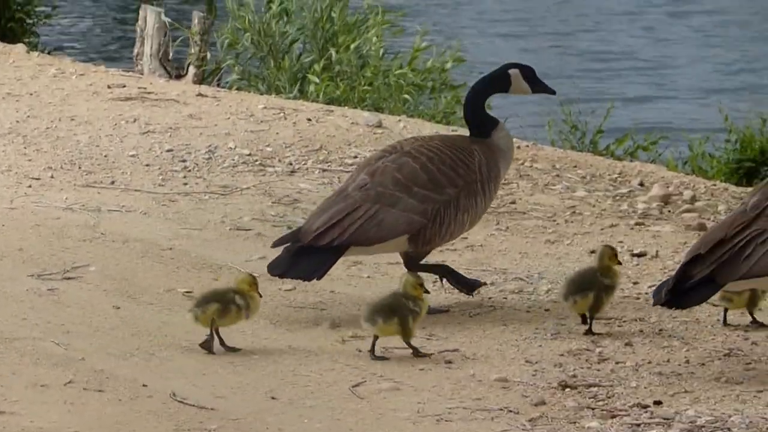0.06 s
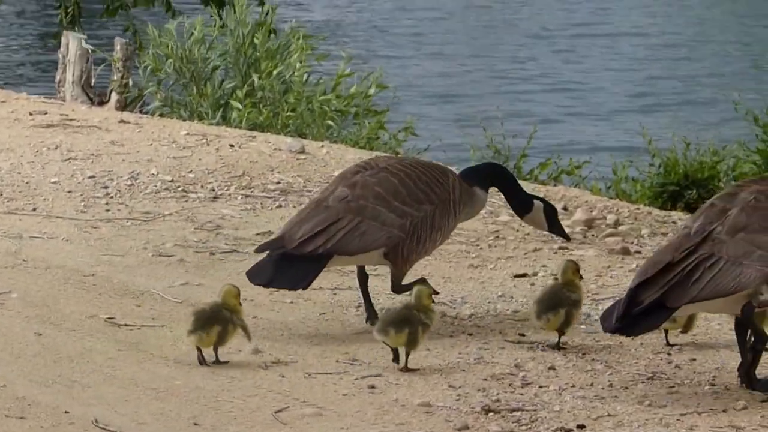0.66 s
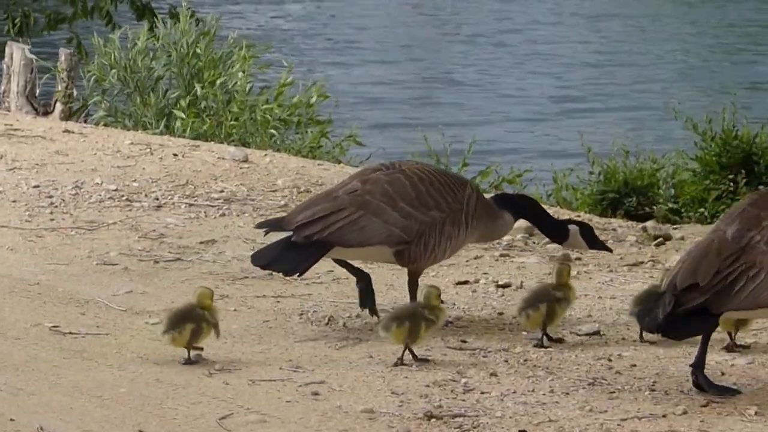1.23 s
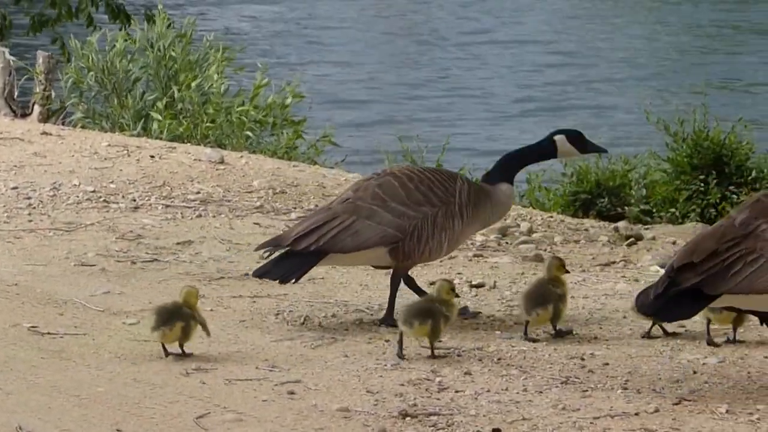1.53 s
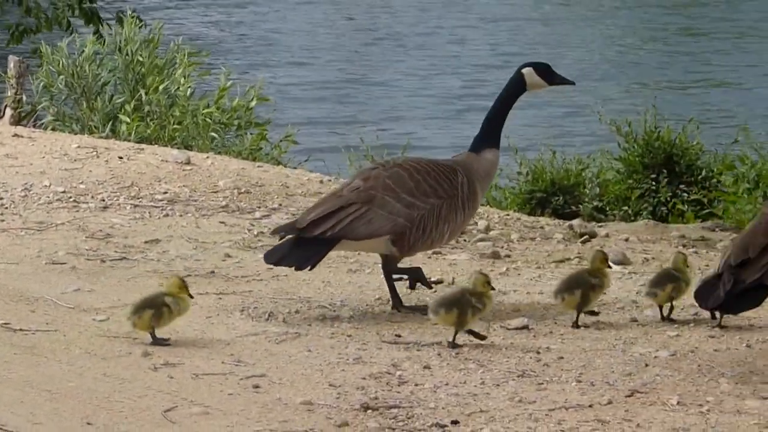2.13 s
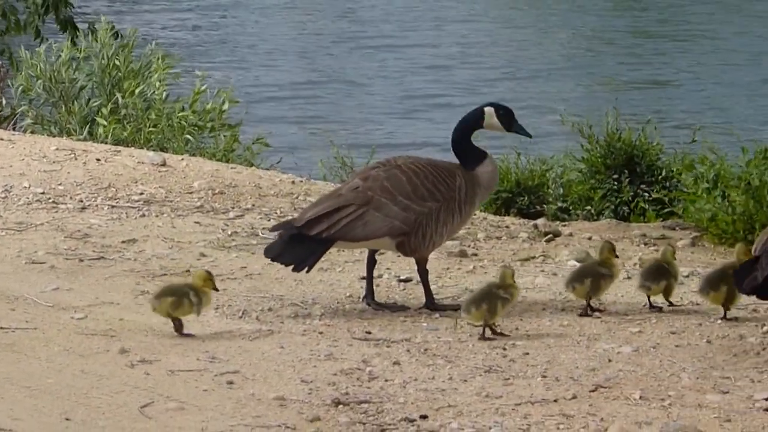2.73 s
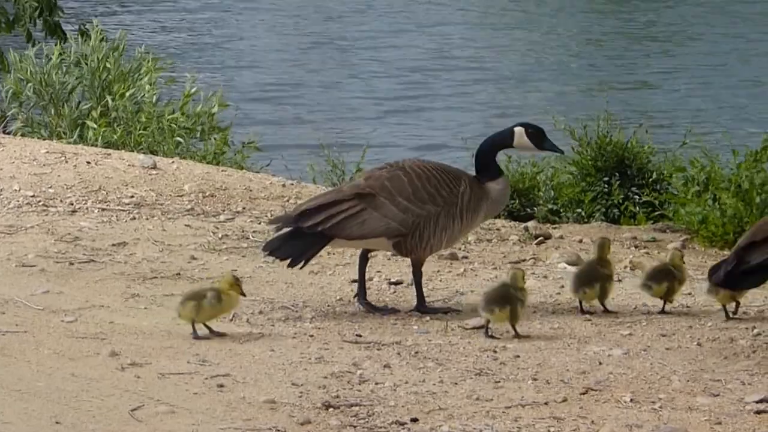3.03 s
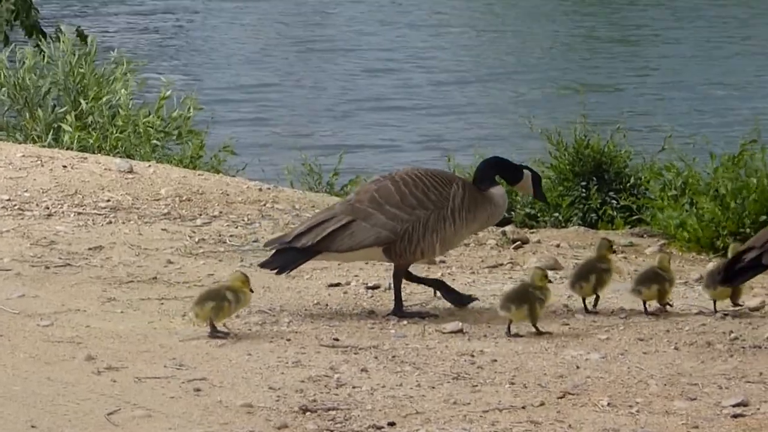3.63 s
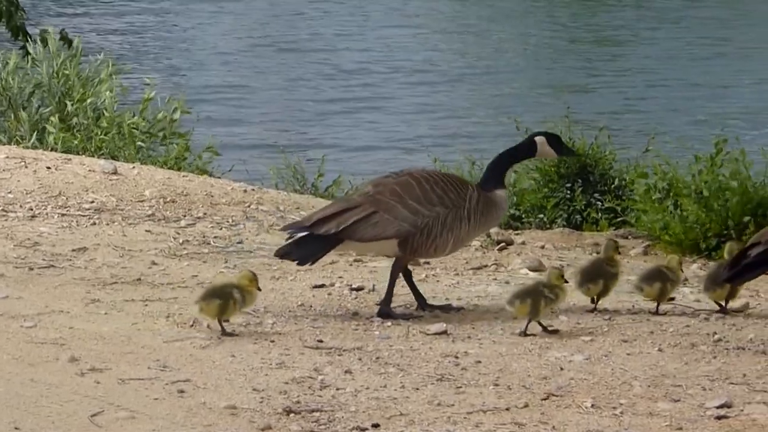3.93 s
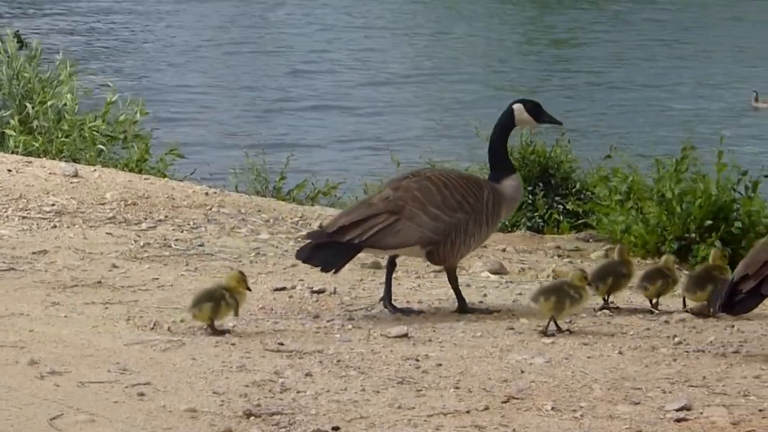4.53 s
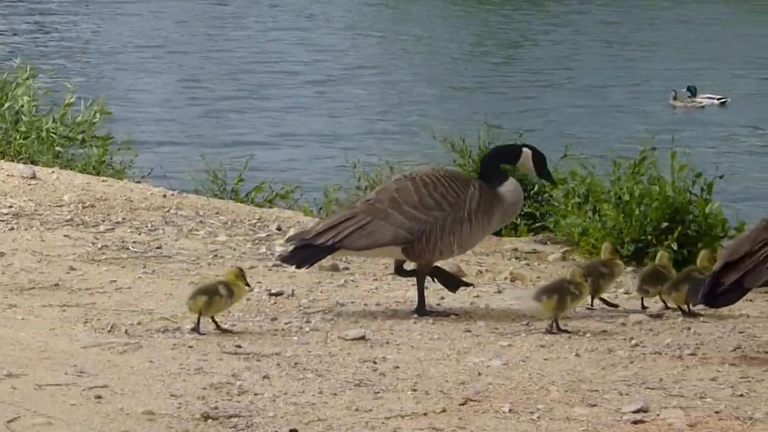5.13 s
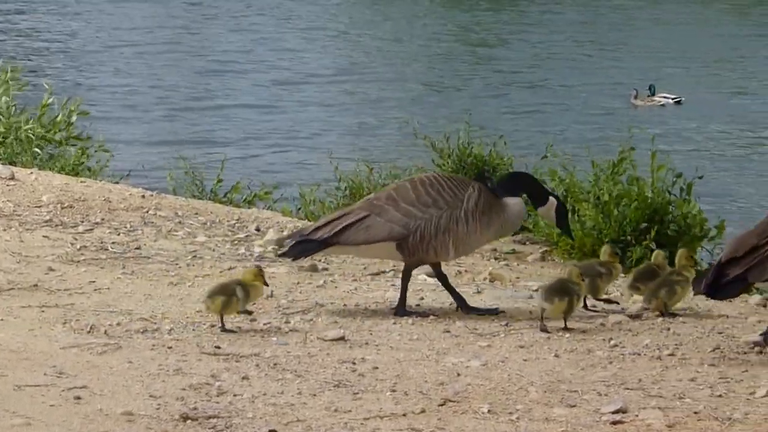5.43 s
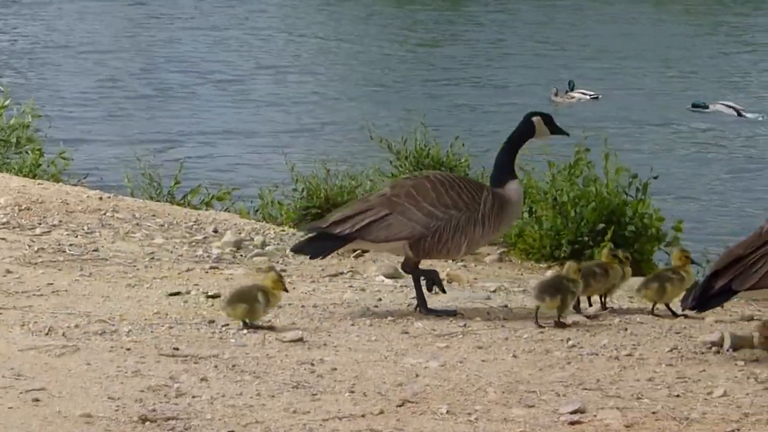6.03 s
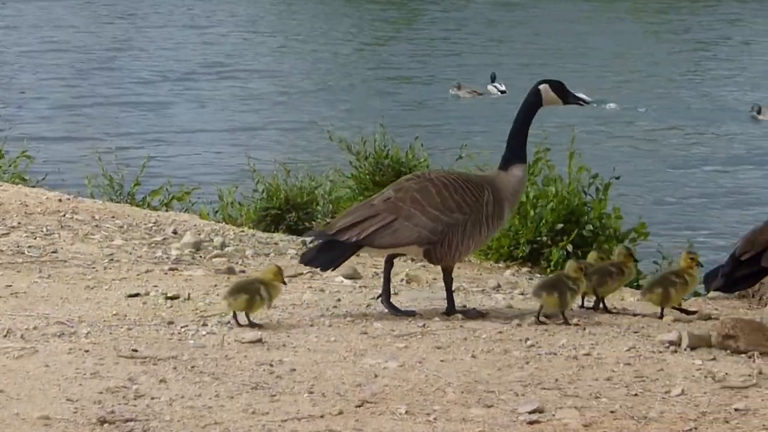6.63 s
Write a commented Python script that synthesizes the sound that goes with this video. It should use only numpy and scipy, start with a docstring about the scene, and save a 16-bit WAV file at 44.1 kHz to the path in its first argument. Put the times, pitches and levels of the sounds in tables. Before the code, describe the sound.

Geese honk in a quick run of short, rattly calls on a lake shore, with a few faint gosling peeps. The honks pause, one bird hisses softly, then a second run follows, clearer and quieter. Wind rumbles on the microphone, with one hard thump near the end of the first run. A soft wash of water and leaves and a far engine hum fade underneath.

```python
"""Geese on a windy lake shore

Geese lead their goslings along the water in runs of short honks that start as a rattle and break
into a clear tone. The goslings peep, one bird hisses softly, and a far engine fades behind the wash
of the shore. Gusts buffet the microphone, and the hardest one makes the limiter duck."""
import sys
import numpy as np
from scipy import signal
from scipy.fft import rfft, irfft, next_fast_len
from scipy.io import wavfile
from scipy.ndimage import uniform_filter1d, minimum_filter1d

SR = 44100
rng = np.random.default_rng(int(sys.argv[2]) if len(sys.argv) > 2 else 0)


def unload_audio(sound):
    """Save the sound as a 16-bit wav file, at the path given as the first command line argument."""
    columns = np.transpose(np.atleast_2d(sound))
    # keep every value between -1 and 1, then stretch to whole-number steps
    steps = np.round(np.clip(columns, -1, 1) * 32767)
    wavfile.write(sys.argv[1], SR, steps.astype(np.int16))


N = 298557

# Cue levels are set ahead of the mix trims; EQ curves give shape only.
# Honks: start_s, end_s, top_hz, droop_share, level_db, second_harmonic_relative_db,
# overtones_relative_db, swell_s, fade_s, lowest_resonance_hz, resonance_rise_hz, upper_tuning_ratio
HONK_CUES = [(-0.09, 0.1, 1005, 0.075, -22.5, -15.5, -14, .04, .10, 2060, -2, 0.92),
             (0.19, 0.413, 1000, 0.076, -19.5, -16.5, -16, 0.1185, 0.074, 2100, 0, 0.95),
             (0.56, 0.755, 1070, 0.071, -21, -10, -15, 0.037, 0.094, 2530, 548, 1.01),
             (0.92, 1.105, 1070, .04, -21.5, -14.5, -15.5, .025, 0.065, 2370, 101, 1.002),
             (1.253, 1.44, 1065, .05, -21, -13, -21, 0.024, 0.018, 2350, -2, 1.027),
             (1.636, 1.825, 1058, 0.042, -21, -13.5, -16.5, 0.0062, 0.069, 2130, 0, 0.994),
             (2.025, 2.203, 1040, .045, -29.5, -15.5, -19.5, .004, 0.021, 2040, 247, .96),
             (2.512, 2.712, 1034, 0.054, -27, -12.5, -20, 0.0442, 0.067, 2100, 0, 1.0),
             (3.552, 3.915, 1030, .05, -26, -14, -18, .04, 0.31, 2000, -1, 0.998),
             (3.912, 4.147, 1020, .04, -32, -9.5, -16.5, 0.023, 0.061, 2230, 0, 1.05),
             (4.272, 4.47, 1034, .04, -35, -11.5, -15, 0.026, 0.093, 2160, 0, 1.026),
             (4.615, 4.8, 1086, 0.041, -34, -7.5, -13, 0.1, 0.07, 2420, -6, 1.08),
             (5.007, 5.205, 1056, 0.036, -35, -12, -16.5, 0.019, 0.061, 2370, -5, 1.03),
             (5.39, 5.58, 1044, 0.037, -35.5, -12.5, -17.5, 0.033, .06, 2120, 0, 1.01),
             (5.862, 6.055, 1030, .035, -37, -10, -20, 0.018, .02, 2290, -2, 1.03),
             (6.61, 6.82, 1030, .04, -32.5, -13.5, -20, .025, 0.057, 2190, 0, 1.007)]
# Breaks into a clear tone: start_s, end_s, top_hz, clear_share, odd_overtones_db, second_boost_db
CLEAR_CUES = [(0.943, 1.059, 1074, 0.47, 8, -4), (1.332, 1.417, 1141, 0.98, -6, 7.5),
              (1.707, 1.802, 1123, .89, -10, 6.5), (2.094, 2.172, 1131, 0.99, -5, 8.5),
              (3.681, 3.763, 1115, .83, -9, 7), (3.958, 4.109, 1148, 1, -12, 9),
              (4.345, 4.438, 1143, 1, -9, 12), (4.662, 4.784, 1153, 0.94, 0, 5.5),
              (5.059, 5.172, 1126, 1, 0, 8.5), (5.454, 5.536, 1120, 0.89, -2, 6)]
# Throat colour for the fundamental, second harmonic and overtones: frequency_hz, gain_db
FUNDAMENTAL_EQ = [(550,-49.5),(740,-2.5),(870,0),(1020,3.5),(1200,-4),(1330,-0.5),(1700,-8)]
SECOND_EQ = [(1200,-39),(1600,3),(1950,9),(2300,14.5),(2600,13),(2850,-22),(3300,-59)]
OVERTONE_EQ = [(2200,-32.5),(2650,9.5),(3100,-4),(3550,2),(4100,3.5),(4650,3),(5300,-0.5),(6050,2.5),(6800,-10.5),(8300,7),(10500,-13),(12300,-13),(15000,-31.5)]
# Faders of the shore bed: time_s, wash_db, rustle_db
SHORE_FADERS = [(0.14, -36.5, -49), (1.2, -36.5, -48), (1.57, -38.5, -49), (2.24, -42.5, -52),
                (2.42, -50, -54), (2.78, -45, -53.5), (3.1, -45.5, -87), (3.47, -48, -50.5),
                (4.21, -51, -54), (4.53, -53.5, -58.5), (4.92, -56, -59.5), (6.33, -55.5, -59.5),
                (6.5, -53.5, -56.5)]
# Colour of the low wash and the bright rustle: frequency_hz, gain_db
WASH_EQ = [(25,-40),(60,-27.5),(110,-8),(250,-6.5),(500,-11),(650,-3),(820,2.5),(1000,0.5),(1400,-2),(2000,-11),(3000,-21),(5000,-22.5)]
RUSTLE_EQ = [(1200,-34),(2200,-5.5),(3200,-2),(4300,3),(5500,3),(7000,-0.5),(8500,-6.5),(10000,-12),(12500,-23),(15500,-32)]
# The far engine fading: time_s, level_db
ENGINE_FADER = [(0, -50.5), (1.2, -51.5), (1.9, -56), (2.5, -51.5), (3.2, -58.5), (6.77, -66.5)]
# Gosling peeps and one far call: start_s, length_s, from_hz, to_hz, level_db
PEEP_CUES = [(0.455,0.05,3330,3930,-46), (1.118,0.043,6760,7270,-43.5), (1.155,0.03,7050,7320,-53),
             (2.69,0.042,4144,4280,-51), (2.77,0.065,4270,4274,-57)]
FAR_CALL_CUES = [(1.44,0.096,1240,1357,-32.5)]
# Wind strength on the microphone: time_s, level_db
WIND_FADER = [(0.74, -56), (0.9, -44), (1.18, -40), (1.32, -50), (1.62, -47), (1.72, -32.5), (1.92, -33),
              (2.2, -43), (2.44, -27.5), (2.62, -35.5), (2.86, -29.5), (3.52, -41.5), (3.87, -28),
              (4.6, -30), (4.9, -29), (5.4, -29.5), (6.22, -27), (6.3, -46.5), (6.56, -36.5), (6.77, -32.5)]
# The hardest buffets: peak_s, level_db, width_s
BUFFET_CUES = [(0.896, -29, 0.0068), (1.21, -28, 0.025), (1.42, -27.5, .012), (1.947, 1, 0.0062),
               (2.082, -20.5, .005), (2.286, -24.5, 0.0074), (2.461, -28.5, 0.026), (2.783, -28, 0.0064),
               (2.924, -26, 0.0067), (3.22, -30.5, 0.046), (3.339, -23.5, .01), (3.701, -19, 0.0074),
               (4.257, -20, 0.0056), (4.465, -20, 0.0098), (4.549, -14.5, 0.0029), (4.6, -23, .015),
               (5.234, -21.5, .004), (5.391, -22, 0.0074), (5.648, -26, 0.0075), (5.72, -16, 0.0052),
               (5.9, -26.5, .018), (6.42, -26, 0.011), (6.564, -27, 0.013)]
# Colour of the wind rumble: frequency_hz, gain_db
WIND_EQ = [(21, -78), (35, -13.5), (90, -12.5), (144, 2), (263, -0.5), (376, -3.5), (578, -6.5),
           (632, -8.5), (920, -18), (1080, -29), (1440, -34.5), (2500, -53.5), (3250, -63), (5500, -120)]
# The swell of a goose's hiss: time_s, level_db
HISS_FADER = [(0,-100),(2.55,-94),(2.8,-52.5),(3.0,-51.5),(3.2,-49.5),(3.32,-51),(3.4,-57.5),(3.6,-100)]
# Colour of that hiss: frequency_hz, gain_db
HISS_EQ = [(1500,-31.5),(2500,-19),(3600,-4),(5000,-0.5),(6500,-4),(8500,-9),(10500,-17.5),(15000,-38)]

UPPER_WINDPIPE_HZ = np.array([3003, 3984, 4970])  # resonances, retuned for each honk
TIME_S = np.arange(N) / SR


def from_db(db):
    """Decibels to gain."""
    return 10 ** (np.asarray(db) / 20)


def unit_power(x):
    """Scale to unit power."""
    return x / np.sqrt(np.mean(x ** 2) + 1e-20)


def faders(rows):
    """Straight fader moves between timed points, one curve per level column."""
    times, *columns = np.transpose(rows)
    return [np.interp(TIME_S, times, column) for column in columns]


def drift(rate_hz):
    """A smooth random wander of unit power, changing about rate_hz times a second."""
    hz = np.fft.rfftfreq(2 * N, 1 / SR)[:N // 20]
    noise = rng.standard_normal(2 * len(hz) - 2)
    slow = irfft(rfft(noise) * np.exp(-(hz / rate_hz) ** 2 / 2))
    return unit_power(np.interp(np.arange(N) / 20, np.arange(len(slow)), slow))


def equalised(x, curve):
    """Shape a sound with an EQ curve; unit power."""
    size = next_fast_len(N)
    hz, db = np.transpose(curve)
    bins = np.fft.rfftfreq(size, 1 / SR) + 1
    gain = from_db(np.interp(np.log(bins), np.log(hz), db, left=-90, right=-90))
    return unit_power(irfft(rfft(x, size) * gain, size)[..., :N])


def filtered(x, kind, hz, order=1):
    """A gentle low-pass or high-pass."""
    return signal.sosfilt(signal.butter(order, hz, kind, fs=SR, output="sos"), x)


def resonate(x, hz, width_hz):
    """A moving resonance: shift its centre to zero, low-pass, shift back; unit power."""
    turn = np.exp(2j * np.pi * np.cumsum(hz) / SR)
    return unit_power((filtered(x / turn, "low", width_hz / 2, order=2) * turn).real)


def panned(x, right_db):
    """Place a sound so that the right side is louder by right_db."""
    gains = from_db([[0], [right_db]])
    return x * gains / gains.mean()


def wide_noise(curve, side_db):
    """Stereo noise that opens wider in the top octaves."""
    mid, side = equalised(rng.standard_normal((2, N)), curve)
    side = side + 2.8 * filtered(side, "high", 7000)
    return mid + from_db(side_db) * side * [[1], [-1]]


def around(start, end):
    """The samples of a cue with short handles, and their times."""
    at = np.arange(max(int(start * SR) - 600, 0), min(int(end * SR) + 600, N))
    return at, at / SR


def ramp(t, start, end, edge_s):
    """1 between start and end, 0 outside, with edges edge_s long."""
    return np.clip(np.minimum(t - start, end - t) / edge_s + .5, 0, 1)


def honk_shapes(slack_db=-10.5, dull_db=-2.5, slack_sag=.035):
    """Pressure peaks mid-honk; as the voice swells and fades it is weaker, duller and flatter."""
    gains, windpipe = np.zeros((3, N)), np.zeros((4, N))
    pitch = np.full(N, float(HONK_CUES[0][2]))
    for (start, end, top_hz, droop, db, second_db, upper_db,
         swell_s, fade_s, lowest_hz, rise_hz, tuning) in HONK_CUES:
        at, t = around(start, end)
        slack = np.clip(1 - (t - start) / swell_s, 0, 1) ** 2
        slack += np.clip(1 - (end - t) / fade_s, 0, 1) ** 2
        along = (2 * t - start - end) / (end - start)  # -1 to 1 through the honk
        level_db = db + slack_db * slack
        dulled_db = level_db + dull_db * (slack + along ** 2)
        parts_db = [level_db, dulled_db + second_db, dulled_db + upper_db]
        gains[:, at] += ramp(t, start, end, edge_s=0.0017) * from_db(parts_db)
        pitch[at] = top_hz * (1 - droop * along ** 2 - slack_sag * slack)
        windpipe[:, at[0]:] = np.append(lowest_hz, tuning * UPPER_WINDPIPE_HZ)[:, None]
        windpipe[0, at] += rise_hz * along / 2
    return pitch, windpipe, gains


def voice_breaks(rattle_pitch, sag=.03, early=0.1203):
    """The rattle jumps to a tone that peaks early, mostly trading fundamental for second harmonic."""
    pitch, clear, odd_gain, shift_db = rattle_pitch.copy(), np.zeros(N), np.ones(N), np.zeros((3, N))
    for start, end, top_hz, clearness, odd_db, second_db in CLEAR_CUES:
        at, t = around(start, end)
        blend = ramp(t, start, end, edge_s=0.015)
        along = (2 * t - start - end) / (end - start)
        clear_hz = top_hz * (1 - sag * np.abs(along + early) ** 3)
        pitch[at] += blend * (clear_hz - pitch[at])
        odd_gain[at] += blend * (from_db(odd_db) - 1)
        clear[at] = blend * clearness
        shift_db[:2, at] = np.outer([-1.5 * clearness, second_db], ramp(t, start, end, edge_s=0.031))
    return pitch, clear, odd_gain, from_db(shift_db)


def flutter(pitch, rough, beat_hz=132, clear_depth=0.22, rattle_depth=.66):
    """Uneven beats chop the membrane's tone and tug its pitch, harder in the rattle."""
    rate_hz = beat_hz * np.minimum(pitch / 1020, 1.05) ** 2  # higher honks flutter faster
    rate_hz *= 1 + .29 * (0.153 + 0.83 * rough) * drift(47)
    beat = np.cos(2 * np.pi * np.cumsum(rate_hz) / SR)
    depth = clear_depth + (rattle_depth - clear_depth) * rough
    chop = (1 + depth * beat) * from_db(2.5 * rough * drift(26))
    wobbly_hz = pitch * (1 + (0.0033 + .008 * rough) * drift(43.3))
    phase = 2 * np.pi * np.cumsum(wobbly_hz) / SR
    tug = (0.069 + 0.83 * rough) * beat
    scatter = (0.022 + .44 * rough) * drift(76)
    return chop, phase + tug + scatter


def throat(x, curve):
    """Colour one part of the voice and hold its loudness steady, leaving the single beats alone."""
    voice = equalised(x, curve)
    return voice / np.sqrt(np.abs(uniform_filter1d(voice ** 2, size=1300)) + 1e-9)


def honks(clear_top_hz=6130):
    """A fluttering membrane sings near 1 kHz while puffs of turbulent air ring the windpipe."""
    rattle_pitch, windpipe, gains = honk_shapes()
    pitch, clear, odd_gain, shift = voice_breaks(rattle_pitch)
    first_gain, second_gain, upper_gain = gains * shift
    # the top resonance moves up in the clear tone
    windpipe[-1] += uniform_filter1d(clear ** 2, size=1500) * (clear_top_hz - windpipe[-1])
    rough = 1 - clear
    chop, phase = flutter(pitch, rough)
    overtones = sum(np.sin(k * phase) * (odd_gain if k % 2 else 1) / (k - 2) ** 0.88
                    for k in range(3, 7))
    overtones += from_db(-18.5) * rough * sum(np.sin(k * phase) for k in (8, 9, 12))  # rattle buzz
    puffs = chop * rng.standard_normal(N)
    low, middle, high, top = [resonate(puffs, hz, width_hz=280) for hz in windpipe]
    ringing = 2.8 * middle + 1.95 * high + 1.45 * top + 1.4 * puffs
    rasp = 0.12 + 0.29 * rough
    first = throat(chop * np.sin(phase), FUNDAMENTAL_EQ)
    second = throat(chop * np.sin(2 * phase) + 1.5 * rasp * low, SECOND_EQ)
    upper = throat(chop * overtones * (1 - 0.077 * rough) + rasp * ringing, OVERTONE_EQ)
    return (panned(from_db(-0.04) * first_gain * first, right_db=8.5)
            + panned(from_db(-2) * second_gain * second, right_db=5.5)
            + panned(from_db(0.2) * upper_gain * upper, right_db=4))


def shore_echo(x, t60_s=0.12, wet_db=-19, delay_s=0.014):
    """Bank and bushes throw back a thin, dull scatter."""
    t = np.arange(SR // 2) / SR
    returns = rng.standard_normal((2, len(t))) * from_db(-60 * t / t60_s) * (t > delay_s)
    returns = filtered(returns, "low", 3000)
    returns /= np.sqrt(np.sum(returns ** 2, axis=1, keepdims=True))
    return from_db(wet_db) * signal.fftconvolve(x.mean(0)[None], returns, axes=1)[:, :N]


def shore_bed(wash_trim_db=2):
    """A distant wash to the left, under the bright rustle of leaves and water."""
    wash_db, rustle_db = faders(SHORE_FADERS)
    wash = from_db(wash_db + wash_trim_db + drift(5.6)) * wide_noise(WASH_EQ, side_db=-11)
    rustle = from_db(rustle_db + .5 * drift(19)) * wide_noise(RUSTLE_EQ, side_db=-16)
    return panned(wash, right_db=-5) + rustle


def far_engine(hum_hz=107.4):
    """A far engine, heard as one low, wavering hum."""
    hz = hum_hz * (1 + 0.0367 * drift(21.2))
    level_db = faders(ENGINE_FADER)[0] + 1.14 * drift(4.3)
    return from_db(level_db) * np.sin(2 * np.pi * np.cumsum(hz) / SR)


def peeps(cues, waver):
    """Small bird calls: short, rising near-sines that level off."""
    calls, unsteady = np.zeros(N), 1 + waver * drift(105)
    for start, length, from_hz, to_hz, db in cues:
        along = np.clip((TIME_S - start) / length, 0, 1)
        hz = (from_hz + (to_hz - from_hz) * np.sin(np.pi * along / 2)) * unsteady
        swell = from_db(db) * np.sqrt(2) * np.sin(np.pi * along)
        calls += swell * np.sin(2 * np.pi * np.cumsum(hz) / SR)
    return calls


def wind(flow_trim_db=3, unshared_db=-22):
    """Eddies push the microphone's two ports in opposite senses; hard buffets carry more treble."""
    lumps = unit_power(from_db(3 * drift(36) - drift(27)))
    flow = from_db(faders(WIND_FADER)[0] + flow_trim_db) * lumps
    hits = np.zeros(N)
    for peak_s, db, width_s in BUFFET_CUES:
        at, t = around(peak_s - 2 * width_s, peak_s + 2 * width_s)
        hits[at] += from_db(db) * np.exp(-((t - peak_s) / width_s) ** 2 / 2)
    eddies, centre, push = equalised(rng.standard_normal((3, N)), WIND_EQ)
    buffets = hits * push / np.sqrt(uniform_filter1d(push ** 2, size=500) + 0.017)
    opposed = flow * eddies + buffets + 1.26 * filtered(buffets, "high", 900)
    ports = opposed * [[.93], [-1.06]] + from_db(unshared_db) * (flow + hits) * centre
    return filtered(ports, "high", 65, order=2)


def goose_hiss():
    """One soft, bright breath that swells and drops away."""
    return from_db(faders(HISS_FADER)[0]) * wide_noise(HISS_EQ, side_db=-16)


def scene():
    """Birds with their echo, the shore behind them, wind in front."""
    birds = honks() + peeps(PEEP_CUES, waver=0.014) + peeps(FAR_CALL_CUES, waver=0.013)
    return birds + goose_hiss() + shore_echo(birds) + shore_bed() + far_engine() + wind()


def record(dry, threshold_db=-4, release_db_per_s=95, attack_s=0.0045, cutoff_hz=15700):
    """A limiter ducks quickly and recovers slowly; what slips past is rounded off; the top is cut."""
    over_db = np.maximum(20 * np.log10(np.abs(dry).max(0) + 1e-9) - threshold_db, 0)
    recovery_db = release_db_per_s * TIME_S
    duck_db = np.maximum.accumulate(over_db + recovery_db) - recovery_db
    lag = np.exp(-1 / (attack_s * SR))
    ducked = dry * from_db(-signal.lfilter([1 - lag], [1, -lag], duck_db))
    peak_gain = np.minimum(1, .7 / (np.abs(ducked).max(0) + 1e-9))
    limited = ducked * uniform_filter1d(minimum_filter1d(peak_gain, size=60), size=60)
    return signal.sosfilt(signal.ellip(10, .1, 90, cutoff_hz, fs=SR, output="sos"), limited)


dry = scene()
out = record(dry)
unload_audio(out)
```